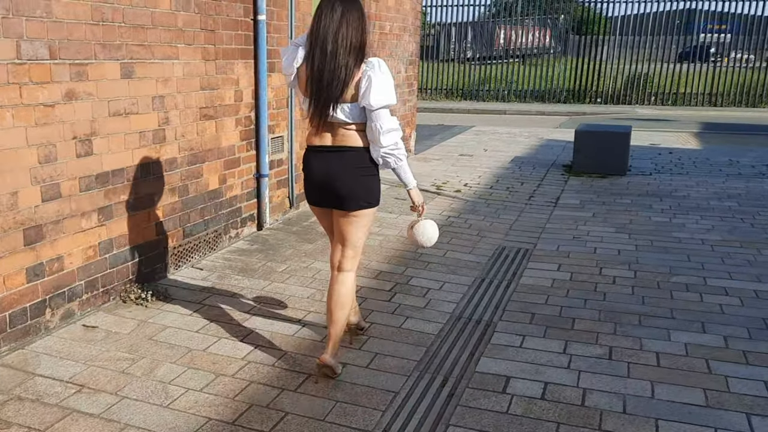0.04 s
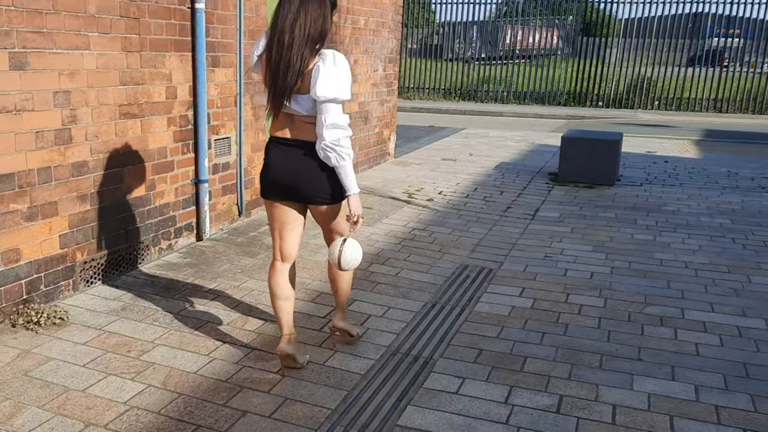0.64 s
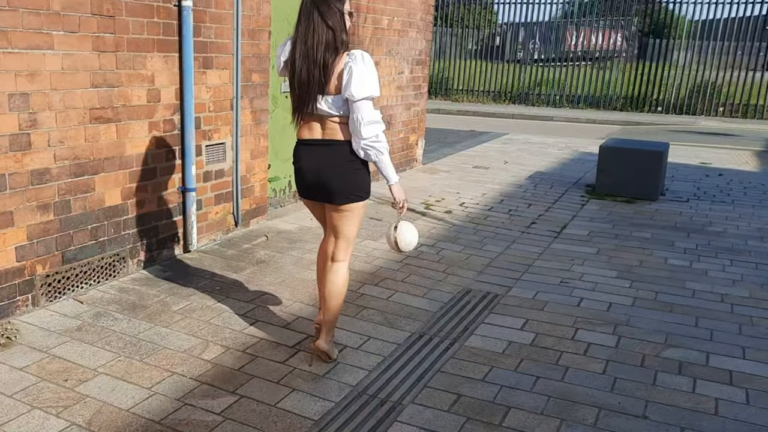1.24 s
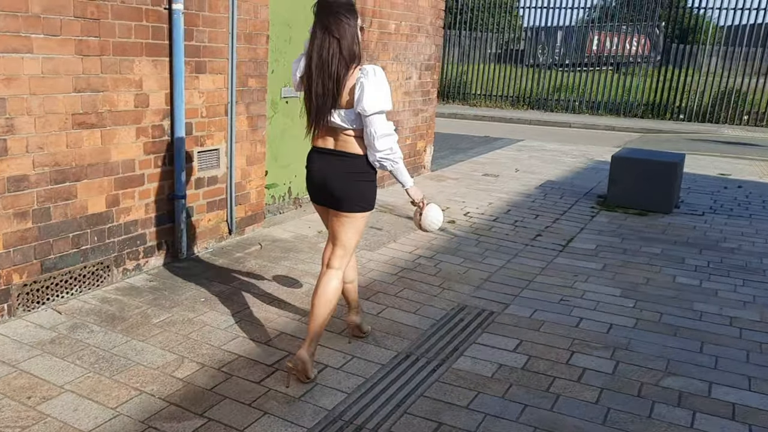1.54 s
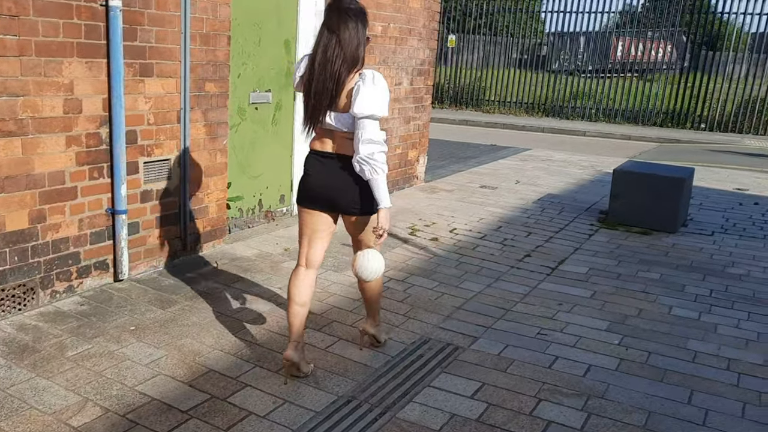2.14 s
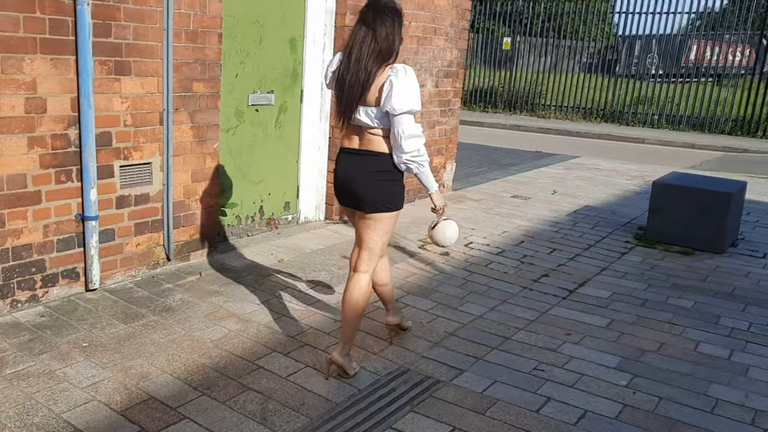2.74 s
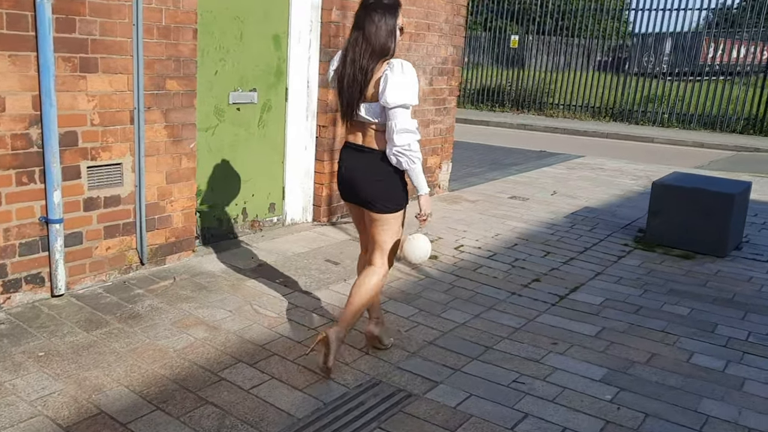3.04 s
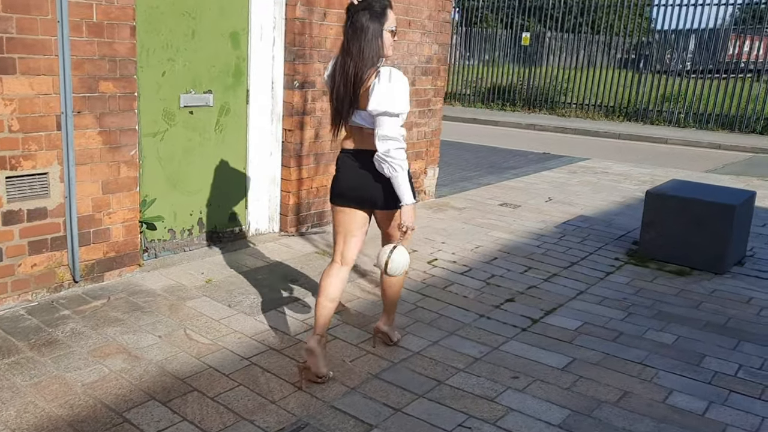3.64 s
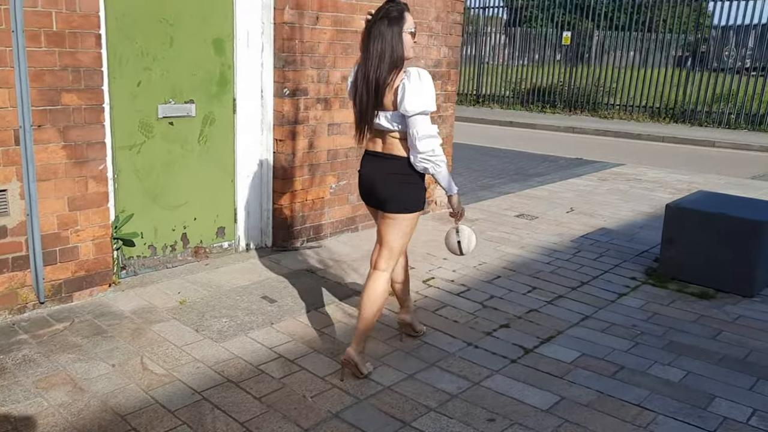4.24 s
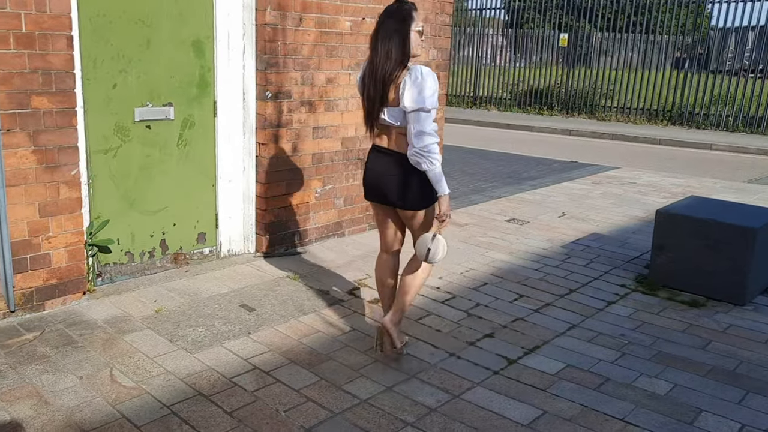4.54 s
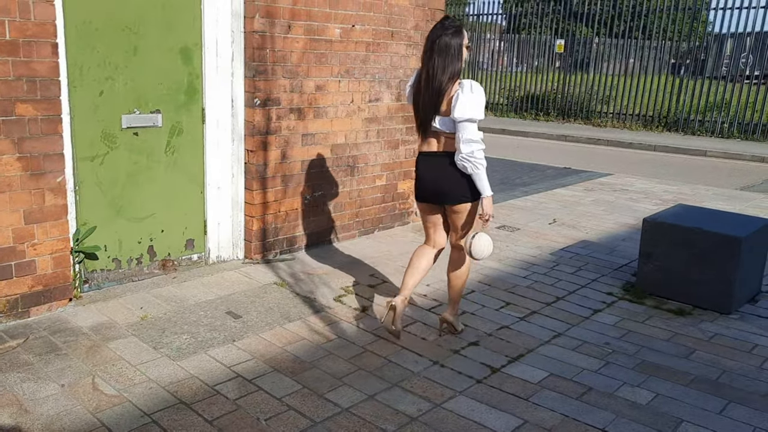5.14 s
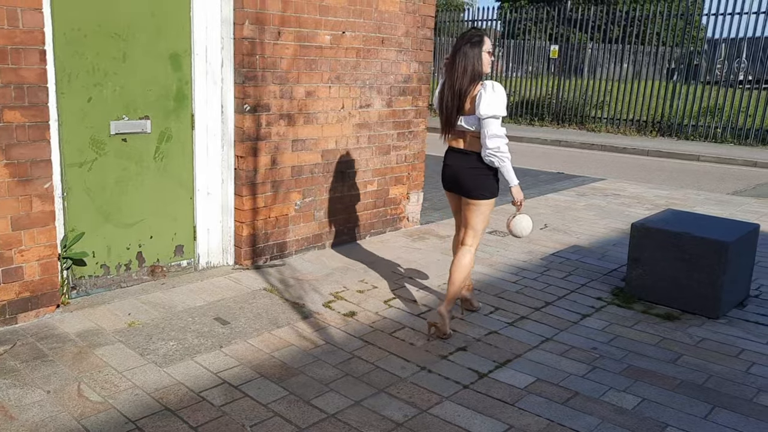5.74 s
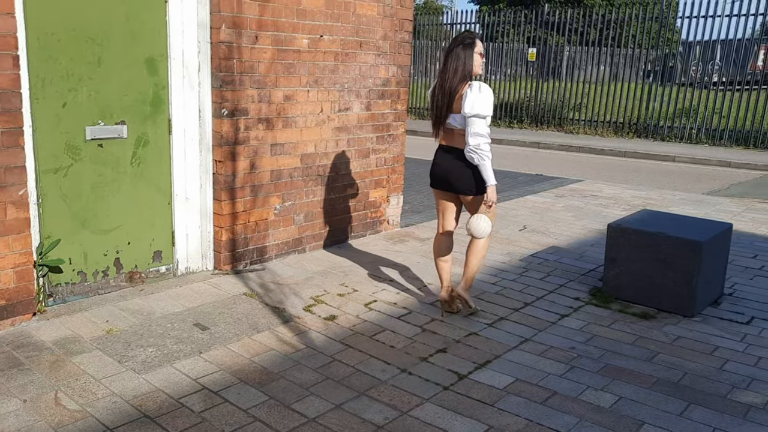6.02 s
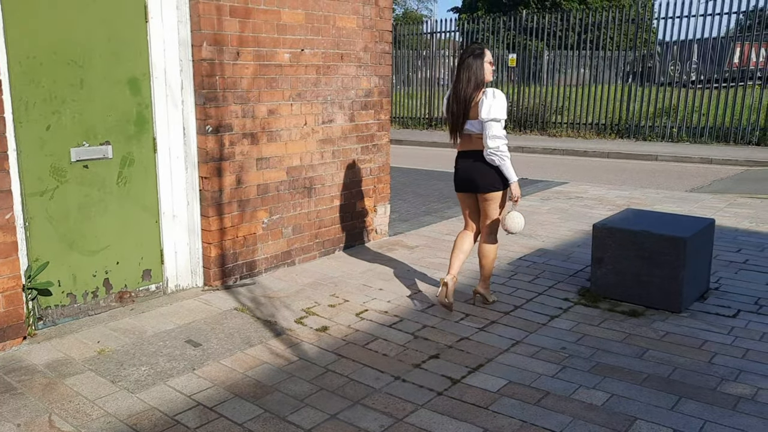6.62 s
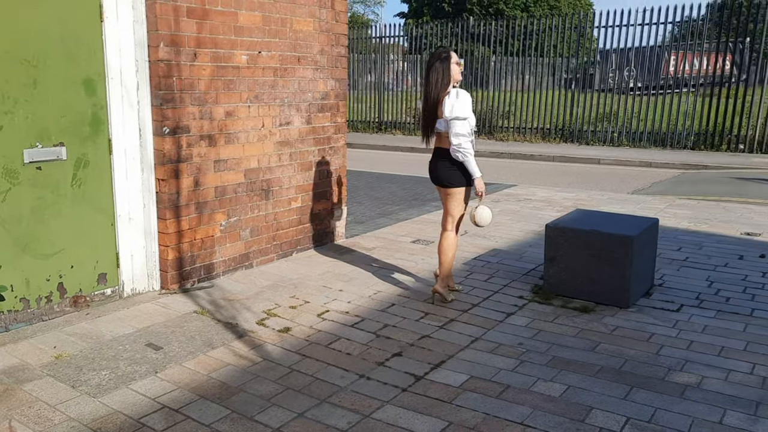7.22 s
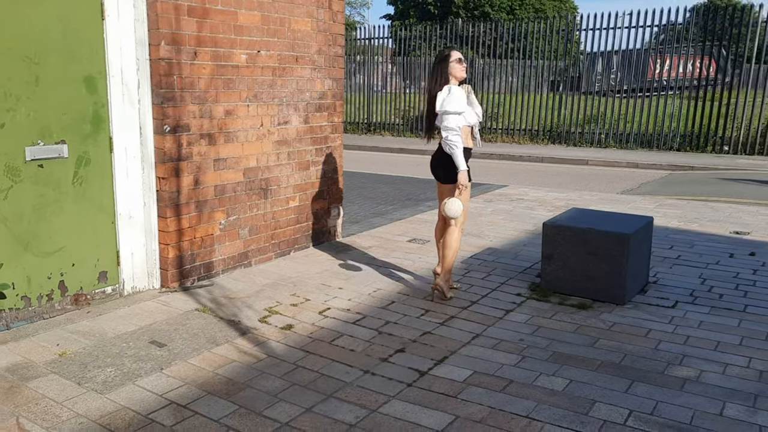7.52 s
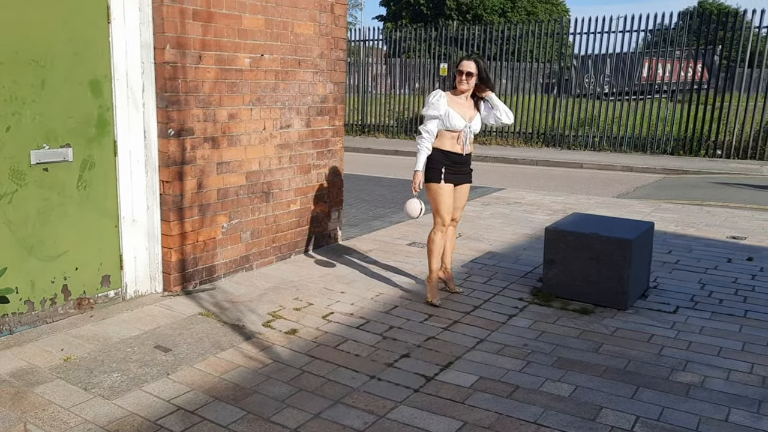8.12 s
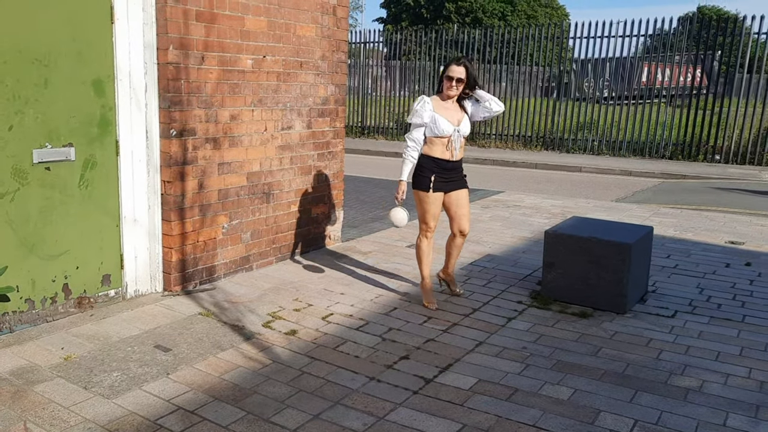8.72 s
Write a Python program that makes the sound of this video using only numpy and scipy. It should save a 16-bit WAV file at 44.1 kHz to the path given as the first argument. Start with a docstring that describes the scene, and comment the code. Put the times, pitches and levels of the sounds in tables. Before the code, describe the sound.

Backless heeled shoes walk at a steady pace on brick paving, each step a sharp heel knock followed by a gritty slap of the sole, with a short echo off a nearby wall. The steps grow softer and end in a couple of light taps and scuffs. Faint birds sing over a low rumble of distant traffic, and three brief gusts of wind buffet the microphone.

```python
"""Heeled mules on brick paving

Backless shoes walk away beside a brick wall, then turn and stop. In each step the heel knocks,
the sole slaps down on grit and the other foot pushes off; wall and street throw the sound back.
Birds sing further off, traffic rumbles, an engine drones and three gusts buffet the microphone."""
import sys
import numpy as np
from scipy import signal
from scipy.fft import rfft, irfft
from scipy.io import wavfile
from scipy.ndimage import uniform_filter1d, map_coordinates

SR = 44100
rng = np.random.default_rng(int(sys.argv[2]) if len(sys.argv) > 2 else 0)


def store_wav(level_fs):
    """Save 16-bit WAV to argv[1]."""
    pcm = np.round(np.clip(np.atleast_2d(level_fs), -1, 1) * 32767)
    wavfile.write(sys.argv[1], SR, pcm.T.astype(np.int16))


N = 386757
T = np.arange(N) / SR


def undb(db):
    """Turn decibels into a gain to multiply by."""
    return 10 ** (np.asarray(db) / 20)


def unit(x):
    """Scale a signal to an average power of 1."""
    return x / np.sqrt(np.mean(x ** 2))


def curve(rows):
    """Join (time, value) points with straight lines."""
    return np.interp(T, *np.transpose(rows))


def add(out, start, x):
    """Mix x into out from a start time in seconds."""
    i = int(start * SR)
    x = x[..., max(-i, 0):out.shape[-1] - i]
    out[..., max(i, 0):max(i, 0) + x.shape[-1]] += x


def colour(x, points, size=4096):
    """Shape the tone of x, like an equaliser set to (frequency [Hz], level [dB]) points."""
    hz, db = np.transpose(points)
    grid = np.maximum(np.fft.rfftfreq(size, 1 / SR), 1)
    gains = undb(np.interp(np.log(grid), np.log(hz), db))
    cepstrum = irfft(np.log(gains))
    # fold it so that the filter never rings ahead of the sound
    cepstrum[1:size // 2] *= 2
    cepstrum[size // 2 + 1:] = 0
    response = irfft(np.exp(rfft(cepstrum))).reshape((1,) * (x.ndim - 1) + (-1,))
    return signal.fftconvolve(x, response, axes=-1)[..., :x.shape[-1]]


def drift(rate):
    """A smooth random wobble that changes about `rate` times a second."""
    hold = int(SR / rate)
    stairs = np.repeat(rng.standard_normal(N // hold + 1), hold)
    return unit(uniform_filter1d(uniform_filter1d(stairs, hold), hold)[:N])


def stereo_noise(n, side_db):
    """Left and right noise; the lower side_db is, the more alike they are."""
    mid, side = rng.standard_normal((2, n))
    return unit(mid + undb(side_db) * side * np.array([[1], [-1]]))


def pan(db):
    """Left and right gains; a positive db makes the left louder."""
    return undb(db * np.array([[1], [-1]]) / 2)


def fade(t, t60):
    """Die away by 60 dB every t60 seconds."""
    return undb(-60 * t / t60)


# tone of the traffic: (frequency [Hz], level [dB])
TRAFFIC_TONE = [(15, -51.5), (53, 0), (160, -6.5), (311, -7.5), (679, -21), (1000, -20.5), (1590, -30.5),
                (2570, -35), (2820, -42.5), (6000, -49), (9000, -100)]
# how the traffic sinks and rises: (time [s], relative level [dB])
TRAFFIC_LEVELS = [(0.0, -50), (7.08, -59), (8.77, -55.5)]
def traffic(gain_db=4, swell_db=1.77):
    """Distant traffic blends into a low, gently swelling rumble."""
    rumble = unit(colour(stereo_noise(N, -2.37), TRAFFIC_TONE))
    return rumble * undb(curve(TRAFFIC_LEVELS) + gain_db + swell_db * drift(10))


# tone of the hiss: (frequency [Hz], level [dB])
HISS_TONE = [(6000, -17), (7700, 1.5), (9500, -10.5), (12500, -5.5), (16000, -19)]
def hiss(level_db=-82):
    """A thin, faint hiss lies behind everything."""
    return unit(colour(stereo_noise(N, -17.5), HISS_TONE)) * undb(level_db + drift(10))


# how the engine swells and fades: (time [s], relative level [dB])
ENGINE_LEVELS = [(3, -55.5), (4.5, -48.5), (5.6, -55.5), (6.8, -88)]
def engine(pitch_hz=158.5, gain_db=-1):
    """A far-off engine drones on one wavering note."""
    phase = 2 * np.pi * np.cumsum(pitch_hz * (1 + 0.013 * drift(12))) / SR
    waver_db = 2 * drift(25)
    return np.sin(phase) * undb(curve(ENGINE_LEVELS) + gain_db + waver_db)


# chirps that all slide down alike:
# (time [s], length [s], middle pitch [Hz], relative level [dB], warble [share of pitch])
BIRD_CHIRPS = [(-.02, 0.1, 1846, -61, 0.0087), (0.286, 0.054, 2274, -51, 0.028),
               (2.275, 0.13, 2350, -53, 0.068), (2.625, 0.064, 2616, -64, .015),
               (2.656, 0.14, 3050, -67.5, 0.046), (3.342, .11, 4140, -71.5, .08),
               (3.457, 0.18, 7250, -71, 0.0061), (5.913, 0.23, 1855, -64.5, 0.045),
               (6.103, .17, 7300, -73, .04), (7.344, 0.11, 2070, -56.5, .009)]
# whistles, each with its own glide: (time [s], length [s], start pitch [Hz], middle pitch [Hz],
# end pitch [Hz], relative level [dB], warble [share of pitch])
BIRD_WHISTLES = [(.571, .067, 4900, 4710, 4300, -64.5, .0045), (1.871, 0.17, 2400, 2603, 2180, -63, .006),
                 (2.919, 0.423, 2604, 2513, 2515, -63, 0.033), (4.478, 0.59, 601, 616, 597, -61, 0.047),
                 (6.169, 0.28, 2195, 2375, 2292, -62.5, 0.061), (6.742, .343, 665, 722, 752, -65.5, 0.06),
                 (6.803, 0.24, 3170, 2820, 2670, -63, 0.02), (7.419, 0.22, 2105, 2364, 2510, -60.5, 0.011)]
def birds(direct_db=-1, half_fall_hz=97.7):
    """Birds sing gliding notes, some of them trilled, that echo from walls and trees."""
    trill = np.sin(2 * np.pi * np.cumsum(42 + 8 * drift(20)) / SR)
    tremble = trill + 0.6 * drift(300)
    chirps = [(start, length, hz + half_fall_hz, hz, hz - half_fall_hz, db, warble)
              for start, length, hz, db, warble in BIRD_CHIRPS]
    song = np.zeros(N)
    for start, length, *pitches, db, warble in BIRD_WHISTLES + chirps:
        progress = np.linspace(0, 1, int(length * SR))
        glide = np.polyval(np.polyfit([0, 0.5, 1], pitches, 2), progress)
        hz = glide * (1 + warble * np.roll(tremble, -int(start * SR))[:len(progress)])
        note = np.sin(2 * np.pi * np.cumsum(hz) / SR)
        add(song, start, undb(db) * np.sin(np.pi * progress) * note)
    return undb(direct_db) * song + street_echo(song, t60=0.77, echo_db=-2)


# tone of the street's echoes: (frequency [Hz], level [dB])
ECHO_TONE = [(150, -17.5), (400, 6.5), (1000, 3), (4000, 6), (15000, -20)]
def street_echo(x, t60, echo_db):
    """House fronts, fence and paving scatter a sound into many fading echoes."""
    t = np.arange(SR) / SR
    echoes = stereo_noise(SR, 0.95) * undb(3.7 * rng.standard_normal(SR))
    tail = echoes * fade(t, t60) * (1 - np.exp(-t / 0.0015))
    tail = colour(unit(tail) / np.sqrt(SR), ECHO_TONE)
    return undb(echo_db) * signal.fftconvolve(x[None], tail, axes=-1)[:, :N]


# notes a shoe rings with on brick: (pitch [Hz], relative level [dB], time to fade by 60 dB [s])
SHOE_NOTES = [(532, 10, 0.013), (847, 8.5, 0.024), (1023, 11, 0.033), (1807, 11.5, 0.019),
              (2930, -4, 0.026)]
# tone of the hard crack: (frequency [Hz], level [dB])
CRACK_TONE = [(1500, 8), (2800, 11), (4500, -8), (8200, -4.5), (9600, -19), (16000, -25)]
def knock(hz, thud_db, crack_db, contact_s=0.00072, ring_db=-16, rebound_db=-11, rebound_s=0.0075):
    """A shoe hits brick: a clack, a low thud, a short ring, a hard crack and four small bounces."""
    t = np.arange(SR // 8) / SR
    contact = t / contact_s
    clack_hz = hz * (1 + 0.44 * np.exp(-2 * contact))  # drops as the heel tip flattens
    clack = (contact * np.exp(1 - contact)) ** 2 * np.sin(2 * np.pi * np.cumsum(clack_hz) / SR)
    thud_hz = 390 * (1 + 0.18 * rng.standard_normal())
    ring = undb(thud_db + 6.5) * np.sin(2 * np.pi * thud_hz * t) * fade(t, 0.022)
    for note_hz, db, t60 in SHOE_NOTES:
        # notes near the clack's pitch are struck hardest, and no two steps land alike
        detune, force = rng.standard_normal(2)
        gain = undb(db + 2 * force + ring_db - 1.8 * np.log2(note_hz / hz) ** 2)
        cycles = note_hz * (1 + 0.025 * detune) * t + rng.random()
        ring += gain * fade(t, t60) * np.sin(2 * np.pi * cycles)
    blow = clack + ring * (1 - np.exp(-contact))
    burst = stereo_noise(len(t), -12) * fade(t, 0.008)
    out = blow + undb(crack_db + 3.5) * colour(burst, CRACK_TONE)
    for lateness, size in rng.random((4, 2)):
        bounce = undb(rebound_db) * size * np.exp(-lateness) * blow
        add(out, rebound_s * (0.28 + 3 * lateness), pan(8 * rng.standard_normal()) * bounce)
    return out


def grains(n, spread_db):
    """Grit breaks in many tiny cracks of very uneven size."""
    size = undb(spread_db * np.minimum(rng.exponential(size=n // 16 + 1), 4))
    return unit(stereo_noise(n, -6) * np.repeat(size, 16)[:n])


def crunch(db, treble_db=0, rise_s=0.0027, decay_s=0.0046, linger_db=-18.5, linger_s=0.085):
    """The first grains snap on contact; sand crunches under the weight and crackles briefly after."""
    t = np.arange(SR // 4) / SR
    dying_away = np.exp(-t / decay_s) + undb(linger_db) * np.exp(-t / linger_s)
    sand = grains(len(t), 4) * (1 - np.exp(-t / rise_s)) * dying_away
    snap = undb(-3) * stereo_noise(len(t), -10) * np.exp(-t / 0.0008)
    return undb(db) * colour(sand + snap, [(6000, 0), (12000, treble_db)])


# the steps, with relative levels and with delays counted from the heel:
# (time [s], heel level [dB], heel pitch [Hz], heel thud [dB], heel crack [dB], heel grit [dB],
# sole delay [s], sole level [dB], sole pitch [Hz], sole grit [dB], push delay [s], push grit [dB])
FOOTFALLS = [(0.1125, -17, 1500, -10.5, -6, -34, 0.092, -33, 1300, -29.5, 0.33, -27.5),
             (0.871, -29, 1390, -7, -4.5, -29.5, 0.064, -39, 1100, -24.5, 0.231, -24),
             (1.5355, -26.5, 1585, -23, -8, -24, 0.079, -38, 1640, -35, 0.21, -27),
             (2.1528, -44, 1330, 0, -18, -28, 0.053, -37.5, 1270, -35, 0.27, -33),
             (2.8715, -36.5, 1080, -9, -11, -35, 0.11, -44.5, 3000, -33, 0.26, -35.5),
             (3.56, -28, 1240, -10.5, -13.5, -35, 0.073, -36, 1790, -24.5, 0.2455, -29.5),
             (4.2429, -38, 1040, -7, -13, -29, .0787, -42, 1540, -24.5, .258, -25.5),
             (4.944, -47.5, 1310, 7, -16, -37, 0.059, -34.5, 1260, -26, 0.24, -33),
             (5.631, -38.5, 920, -0.5, -10.5, -42, 0.052, -36, 2030, -29, 0.3, -38),
             (6.4623, -40.5, 1380, -22, -33, -46, 0.089, -62, 1500, -35, 0.25, -36)]
# a shoe catching the paving or turning on the spot, with relative levels:
# (time [s], level [dB], pitch [Hz], thud [dB], grit [dB])
SHOE_TAPS = [(0.0958, -31.5, 1140, -1.5, -29.5), (0.133, -29.5, 1190, 2, -22.5),
             (0.2886, -40, 2300, -16, -29.5), (2.232, -35.5, 1320, -12, -37), (7.2396, -43, 1100, -9, -33),
             (7.377, -42.5, 1150, 0.5, -34.5)]
# single grains cracking under a sole: (time [s], relative level [dB])
GRAIN_POPS = [(0.242, -26), (1.6314, -20.5), (2.162, -22), (3.003, -29), (3.566, -22), (3.896, -34),
              (5.716, -30), (5.8049, -32), (6.5864, -26.5)]
# tone of the grit: (frequency [Hz], level [dB])
GRIT_TONE = [(500, -1.5), (2500, -14), (8400, -11.5), (9600, -24.5), (12500, -16), (16000, -23.5)]
def shoes(heel_treble_db=-2.5):
    """The heel lands, the sole follows, the other foot pushes off; returns the knocks and the grit."""
    knocks, grit = np.zeros((2, 2, N))
    for (start, heel_db, heel_hz, thud_db, crack_db, heel_grit_db,
         sole_delay, sole_db, sole_hz, sole_grit_db, push_delay, push_db) in FOOTFALLS:
        add(knocks, start, undb(heel_db) * knock(heel_hz, thud_db, crack_db))
        add(grit, start, crunch(heel_grit_db, heel_treble_db))
        add(knocks, start + sole_delay, undb(sole_db) * knock(sole_hz, thud_db=-23, crack_db=-14))
        add(grit, start + sole_delay, crunch(sole_grit_db))
        add(grit, start + push_delay, crunch(push_db))
    for start, db, hz, thud_db, grit_db in SHOE_TAPS:
        add(knocks, start, undb(db) * knock(hz, thud_db, crack_db=-23))
        add(grit, start, crunch(grit_db, heel_treble_db))
    for start, db in GRAIN_POPS:
        add(grit, start, crunch(db, decay_s=0.002, linger_db=-25))
    return knocks, colour(grit, GRIT_TONE)


def wall_echo(x, echo_db=-5, first_delay_s=0.0058, growth_s_per_s=0.000392, right_lag_s=0.00024):
    """The wall's echo comes later as the walker moves away from it, and reaches the left side first."""
    delay = first_delay_s + growth_s_per_s * T
    left = map_coordinates(x[0], [(T - delay) * SR])
    right = map_coordinates(x[1], [(T - delay - right_lag_s) * SR])
    return undb(echo_db) * np.array([left, right])


def footsteps(left_db=1.5, left_db_per_s=0.05, house_db=-13, house_delay_s=0.0442):
    """The walker drifts a little to the left; the wall, the street and a house front send echoes back."""
    knocks, grit = shoes()
    near = (knocks + wall_echo(knocks) + grit + scuffs()) * pan(left_db + left_db_per_s * T)
    out = near + street_echo(near.mean(axis=0), t60=0.44, echo_db=-10.5)
    house_slap = colour(near[::-1], [(900, -21.5), (2100, 5.0), (4000, -3.5)])  # left and right swap
    add(out, house_delay_s, undb(house_db) * house_slap)
    return out


# soles sliding and sleeves brushing: (peak time [s], half-width [s], level [dB], brightness [Hz])
RUBS = [(0.235, 0.017, -44.5, 1930), (0.354, 0.036, -58, 6550), (1.627, 0.0066, -49.5, 3300),
        (4.01, 0.025, -57.5, 6900), (4.275, 0.014, -54, 2090), (4.454, 0.03, -56.5, 5150),
        (4.857, 0.013, -66.5, 8050), (5.016, 0.011, -45, 11900), (7.292, 0.1, -65.5, 6400),
        (7.699, 0.022, -73.5, 6100), (7.98, 0.075, -61.5, 2980)]
def scuffs():
    """Short swells of gritty rubbing; a pressed sole sounds lower than a light brush."""
    out = np.zeros((2, N))
    for peak, half_width, db, hz in RUBS:
        swell = np.exp(-np.linspace(-2, 2, int(4 * half_width * SR)) ** 2)
        band = [(hz / 6, -24), (hz / 5.8, 0), (hz * 1.36, 0), (hz * 2, -15), (hz * 8, -38)]
        rubbing = unit(colour(grains(len(swell), 3.8), band))
        add(out, peak - 2 * half_width, undb(db) * swell * rubbing)
    return out


# tone of the low swirls of air: (frequency [Hz], level [dB])
SWIRL_TONE = [(30, -17.5), (62, 3), (105, 0.5), (160, -6), (300, -24), (4000, -80)]
# tone of the higher flutter: (frequency [Hz], level [dB])
FLUTTER_TONE = [(80, -2.5), (350, -4.5), (550, -17.5), (5000, -62.5)]
# strength of the gusts, one list for each: (time [s], relative level [dB])
GUST_LEVELS = [
    [(0.75, -46), (0.95, -44.5), (1.116, -30.5), (1.3, -52.5)],
    [(1.88, -54), (2.1, -39.5), (2.16, -52), (2.33, -45)],
    [(6.03, -53), (6.15, -38.5), (6.358, -37), (6.546, -51.5), (6.66, -44), (6.85, -73)],
]
# swirls that hit the microphone head-on:
# (peak time [s], half-width [s], level [dB], flutter compared with swirl [dB])
AIR_THUMPS = [(2.104, 0.02, -29.5, -24), (6.335, 0.0054, -33, 4)]
# which side the air hits harder: (time [s], left minus right [dB])
WIND_BALANCE = [(2.5, 5.5), (5.7, -2.5), (6.35, 5), (7.05, -13), (8.77, -5.5)]
def wind(gain_db=1, breeze_db=-55, ease_s=0.0082, flutter_db=-9.5, strong_db=-38, flutter_growth=0.063):
    """Swirling air buffets each side of the microphone differently; stronger gusts flutter more."""
    swirls = unit(colour(stereo_noise(N, -4.4), SWIRL_TONE))
    flutter = unit(colour(stereo_noise(N, -0.74), FLUTTER_TONE))
    gust = sum(undb(curve(rows)) * (T > rows[0][0]) * (T < rows[-1][0]) for rows in GUST_LEVELS)
    gust = np.abs(uniform_filter1d(gust, int(ease_s * SR)))
    flutter_gain = undb(flutter_db) * (gust / undb(strong_db)) ** flutter_growth
    unsteadiness = undb(3.5 * drift(26))
    blowing = undb(gain_db) * gust * (swirls + flutter_gain * flutter)
    air = (blowing + undb(breeze_db) * swirls) * unsteadiness
    for peak, half_width, db, thump_flutter_db in AIR_THUMPS:
        swell = np.exp(-((T - peak) / half_width) ** 2)
        air += undb(db) * swell * (swirls + undb(thump_flutter_db) * flutter)
    return pan(curve(WIND_BALANCE)) * air


def scene():
    """Everything in the street, mixed in stereo."""
    return footsteps() + birds() + wind() + traffic() + hiss() + engine()


def record(dry):
    """The recorder cuts the highest treble, above 16 kHz."""
    return signal.sosfilt(signal.ellip(10, 0.2, 80, 16000, fs=SR, output="sos"), dry)


dry = scene()
out = record(dry)
store_wav(out)
```